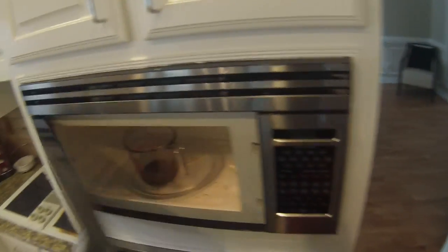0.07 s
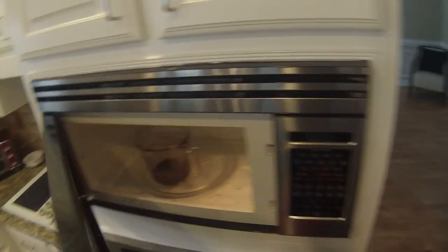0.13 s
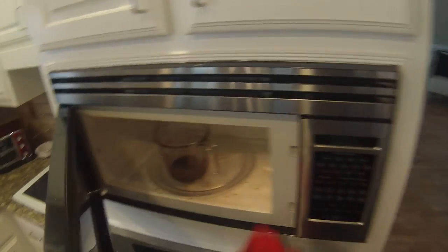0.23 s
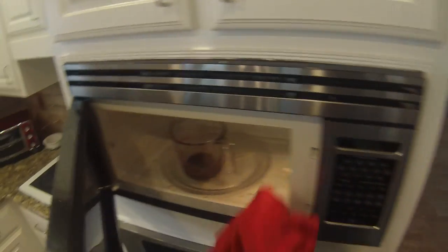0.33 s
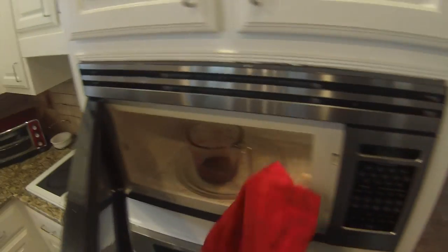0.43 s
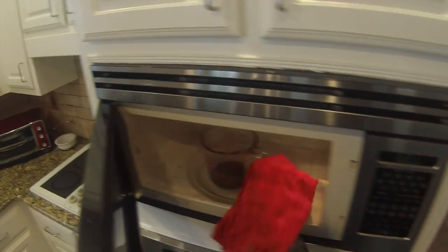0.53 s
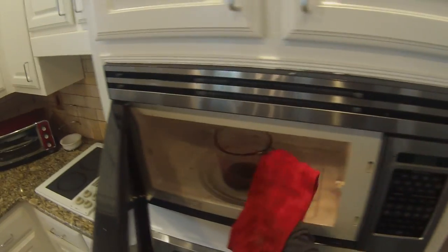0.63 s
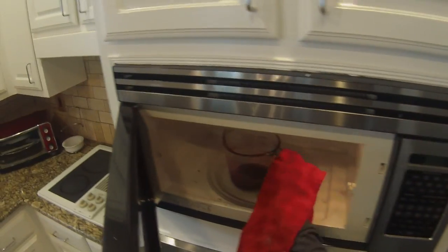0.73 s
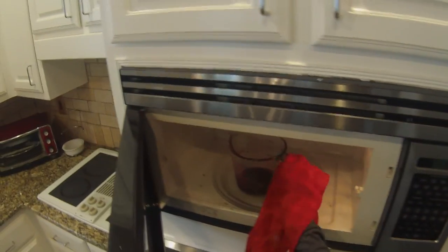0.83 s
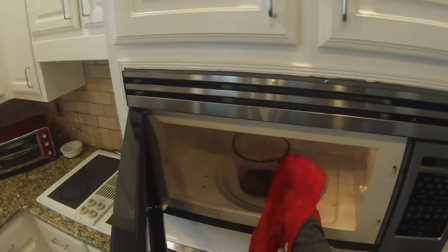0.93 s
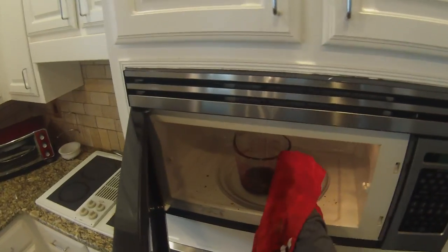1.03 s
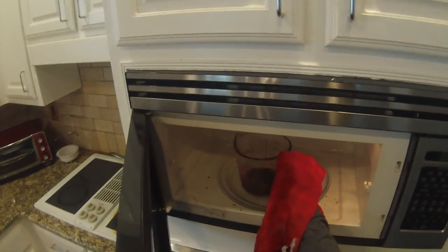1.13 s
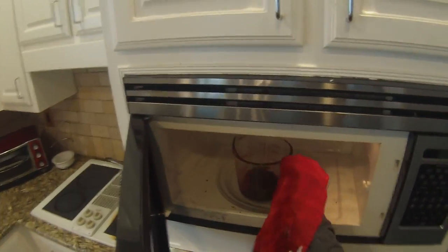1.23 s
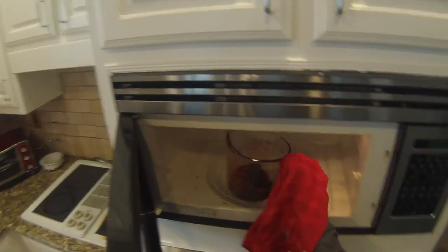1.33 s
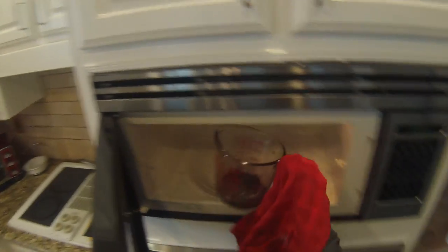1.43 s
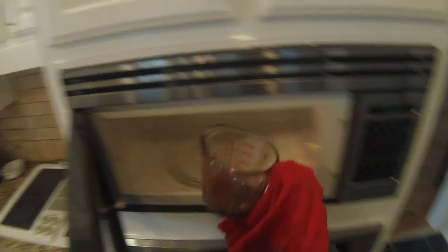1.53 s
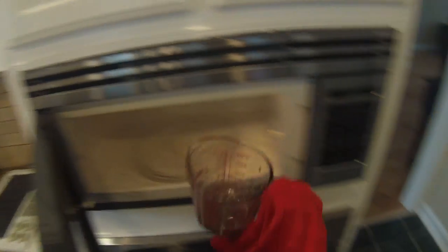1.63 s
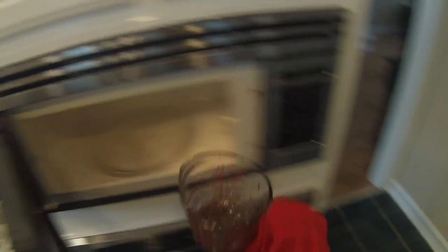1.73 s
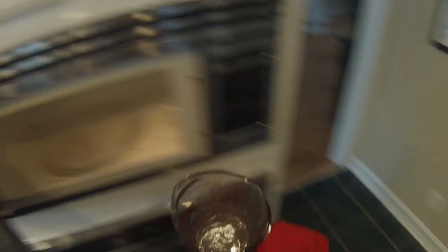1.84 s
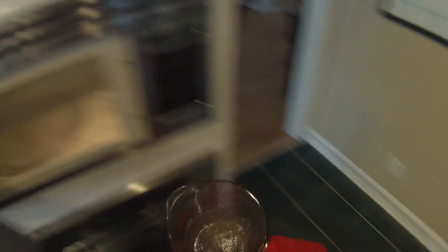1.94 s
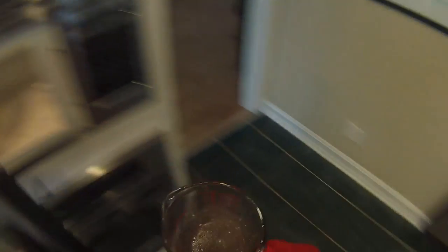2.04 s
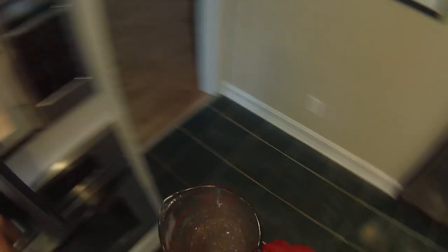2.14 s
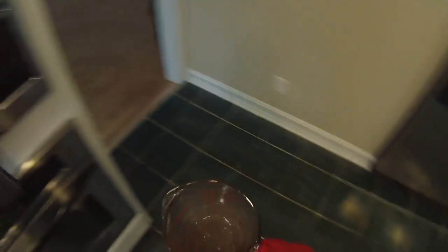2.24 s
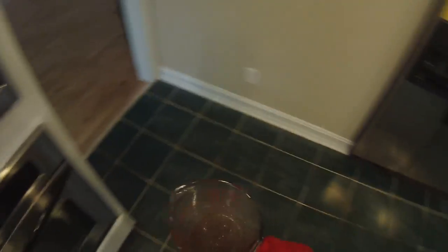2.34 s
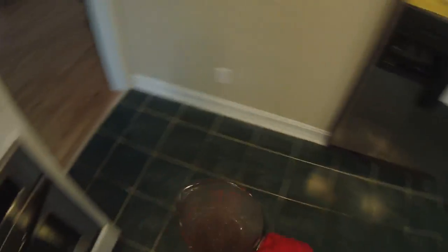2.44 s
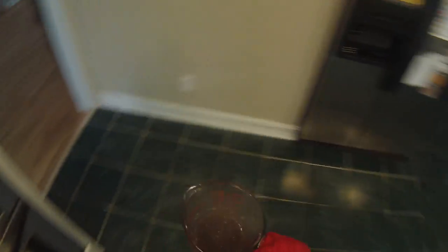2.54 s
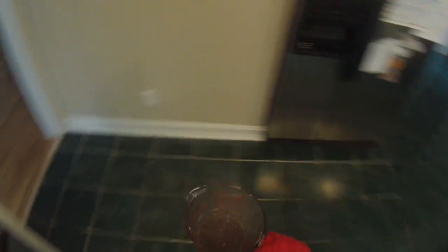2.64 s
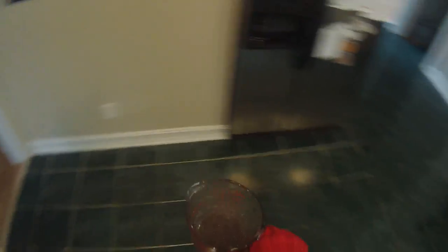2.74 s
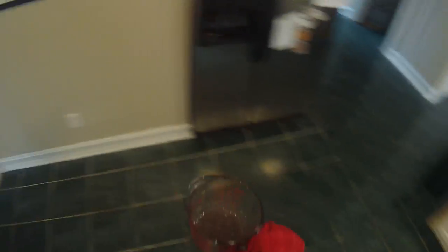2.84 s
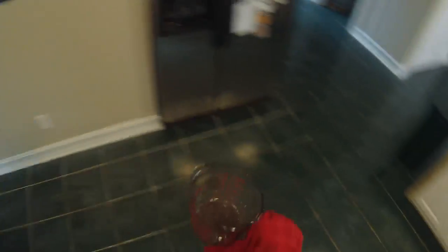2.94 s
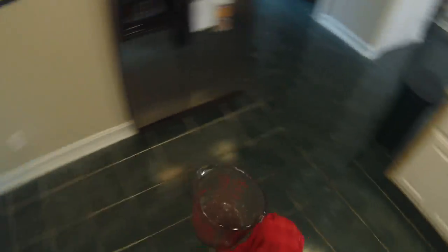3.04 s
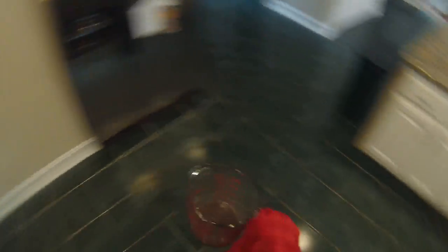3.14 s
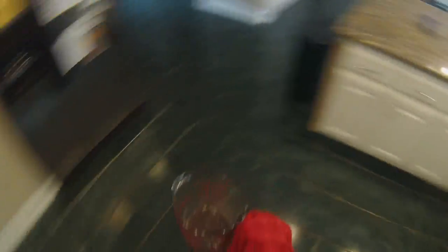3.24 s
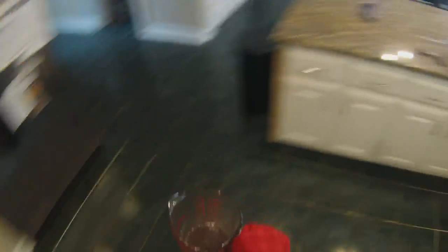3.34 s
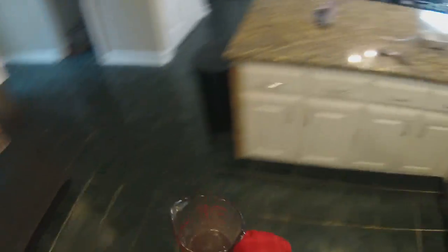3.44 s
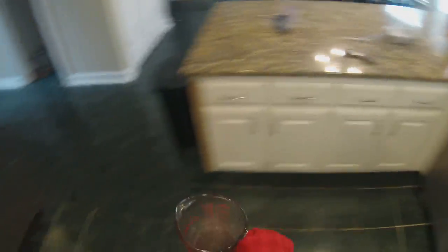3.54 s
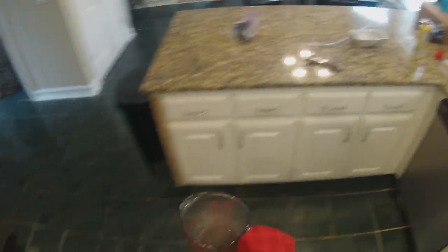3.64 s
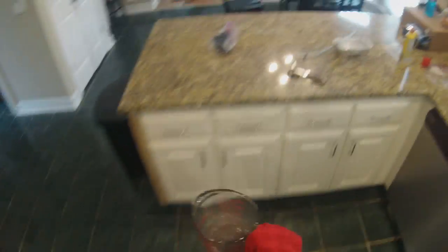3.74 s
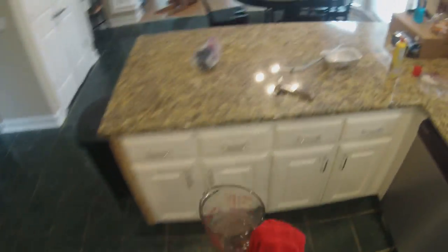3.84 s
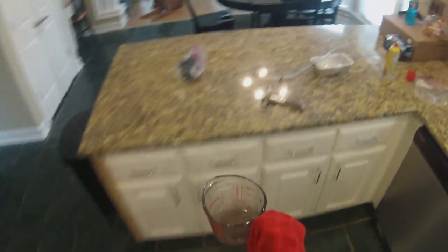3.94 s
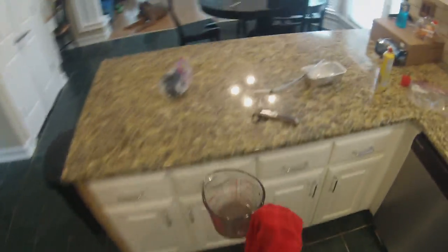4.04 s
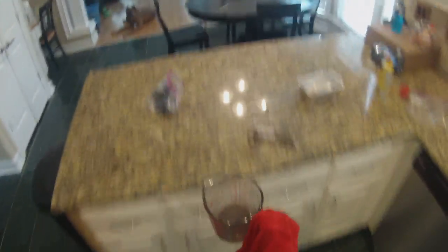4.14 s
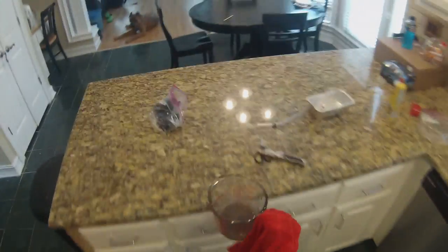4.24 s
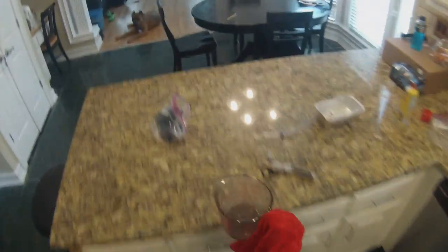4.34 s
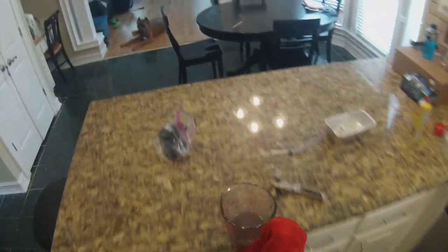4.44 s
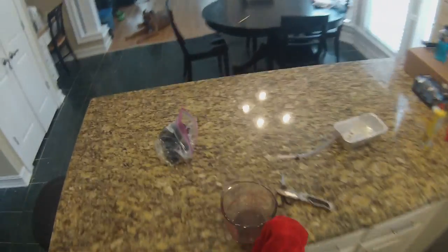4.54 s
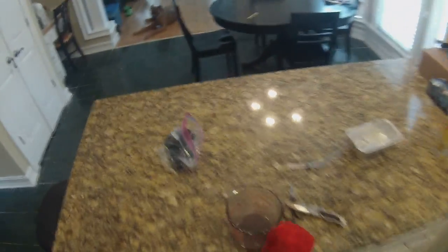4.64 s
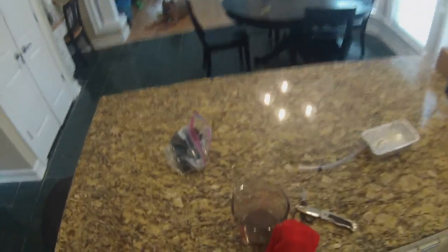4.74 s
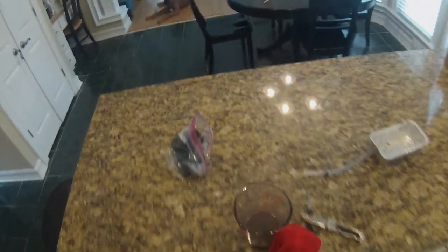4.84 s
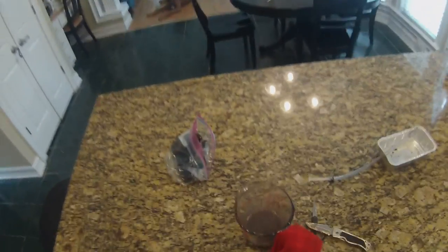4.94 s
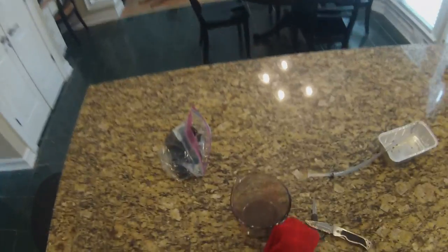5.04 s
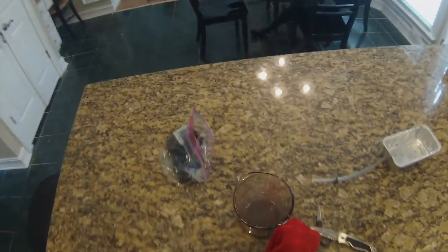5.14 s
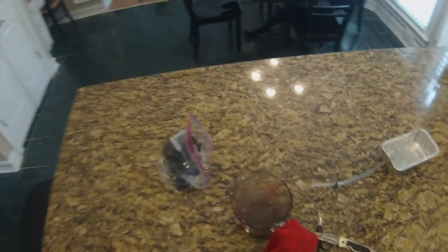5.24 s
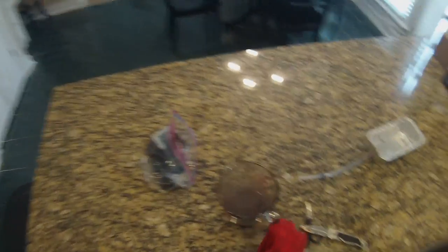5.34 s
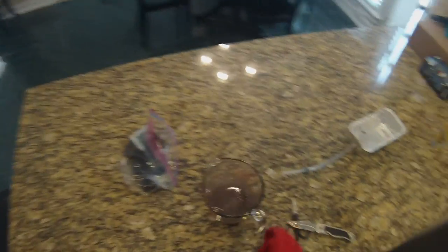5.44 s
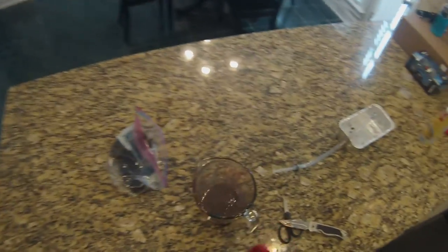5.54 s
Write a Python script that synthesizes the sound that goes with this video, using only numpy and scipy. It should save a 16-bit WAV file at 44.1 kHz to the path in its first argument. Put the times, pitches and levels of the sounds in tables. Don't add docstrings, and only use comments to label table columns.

```python
import sys
import numpy as np
from scipy import signal
from scipy.fft import rfft, irfft, next_fast_len
from scipy.io import wavfile
from scipy.ndimage import map_coordinates

SR = 44100
rng = np.random.default_rng(int(sys.argv[2]) if len(sys.argv) > 2 else 0)


def convert_level_to_amplitude(level_db):
    exponent = np.asarray(level_db, float) / 20
    return 10 ** exponent


def store_pcm(level_fs):
    pcm = np.round(np.clip(level_fs, -1, 1) * 32767).astype(np.int16)
    wavfile.write(sys.argv[1], SR, np.atleast_2d(pcm).T)


N = 246597

# t/s, peak level/dB
CUP_TOUCHES = [(4.898, 3.5), (4.942, -4.5), (4.959, -9.5), (4.995, -5), (5.017, -12.5), (5.027, -11),
               (5.108, -9), (5.12, -12.5), (5.131, -11.5), (5.147, -15.5), (5.234, -25), (5.288, -24),
               (5.352, -22)]
# f/Hz, level/dB
CUP_BODY = [(40, -67), (100, -17), (220, -19), (420, -11), (680, -1.5), (1000, -10), (1900, -14),
            (2700, -23), (3100, -30.5), (3900, -38.5), (4700, -47.5), (5500, -41.5), (9000, -49.5),
            (15000, -60.5)]
# f/Hz, width/Hz, level/dB
CUP_RESONANCES = [(215, 50, -2), (420, 60, 2), (575, 60, -6), (690, 80, 0)]
# t/s, level/dB
RIM_TOUCHES = [(0, -8), (.0016, -2), (.0030, -7), (.0052, -11), (.0078, -15)]
# f/Hz, width/Hz, level/dB
GLASS_EDGE = [(4300, 280, -6), (4850, 630, 6), (8500, 3000, -15), (12300, 1500, -10)]
# t/s, level/dB, rise/s, fade/s
DOOR_SHUDDER = [
    (2.755, -6, 0.041, 0.14),
    (2.786, -22.5, 0.0081, 0.26),
    (2.86, -28.5, 0.24, 0.59),
]
# t/s, peak level/dB
LATCH_BLOWS = [
    (2.754, -19),
    (2.756, 14),
]
# f/Hz, width/Hz, level/dB
OVEN_PANELS = [(105, 50, -10), (200, 80, -2), (290, 110, -3), (418, 90, -2), (500, 100, -2), (592, 90, 0),
               (720, 160, -6), (900, 200, -13)]
# f/Hz, level/dB, t60/s
DOOR_SKIN = [(188.3, 5.5, 0.25), (250, 10, 0.15), (298, 4, 0.15), (414, -40, 0.17)]
# f/Hz, level/dB
LATCH_RATTLE = [(530, -43), (900, 0), (1320, -10.5), (1670, -6), (2310, -7.5), (2390, -9), (3180, -9),
                (3800, -15), (4820, -9), (7230, -21.5), (10600, -29.5), (12800, -30), (15500, -40)]
# t/s, peak level/dB, tray ring level/dB
TRAY_BUMPS = [(0.734, -41.5, 2.5), (0.763, -28, -1), (0.777, -29, -17), (0.799, -35, 8), (0.829, -35, 3),
              (0.894, -38.5, -3), (0.911, -37.5, 7.5), (0.954, -35, -18), (0.984, -42.5, -32),
              (1.029, -41.5, -25)]
# f/Hz, level/dB, t60/s
TRAY_LOW = [(187, 9, 0.16), (322, 8, 0.1), (423, 2, 0.16), (503, -1, 0.22), (677, 10.5, 0.068),
            (1115, -9, 0.15), (1163, -9.5, 0.058)]
# f/Hz, level/dB, t60/s
TRAY_RING = [(769, -1.5, 0.09), (840.4, 4.5, 0.11), (870, -4, 0.088)]
# f/Hz, level/dB, t60/s
CLINK_MODES = [(1560, 0, 0.035), (1850, 2, 0.048), (1930, 6.5, 0.076), (1985, -2, 0.12), (2130, 0, 0.046),
               (2700, -2, 0.11), (2920, -2.5, 0.049), (3930, -6, 0.029), (4760, -10, 0.056),
               (5240, -14.5, 0.17)]
# t/s, peak level/dB, f/Hz, width/Hz
TICKS = [(.144, -51, 7500, 7000), (.179, -52, 6000, 7000), (0.212, -48, 3160, 900), (.238, -39, 3440, 9000),
         (1.295, -38.5, 2600, 12000), (2.546, -51.5, 4700, 1500), (2.611, -36, 1130, 900),
         (2.617, -53, 6000, 8940), (2.702, -49.5, 6500, 4000), (3.132, -53, 5400, 4060),
         (3.131, -51, 1240, 745), (3.524, -51, 5870, 3030), (3.587, -49.5, 3470, 3970)]
# t/s, peak level/dB, f/Hz, t60/s
THUDS = [(0.054, -41, 585, 0.049), (0.091, -45, 218, 0.069), (0.308, -36, 538, 0.11),
         (0.505, -47.5, 202, 0.03), (1.29, -44, 770, 0.14), (1.981, -55, 151, 0.074),
         (2.256, -48.5, 490, 0.35), (2.613, -62, 228, 0.1), (2.699, -41.5, 720, 0.08),
         (3.129, -34, 566, 0.12), (3.48, -49.5, 610, 0.39), (3.931, -43.5, 710, 0.078),
         (4.089, -43, 606, 0.085), (1.03, -42.5, 187, .1), (1.13, -50, 200, 0.34)]
# peak t/s, body level/dB, hiss re body level/dB, rise/s, fade/s
SLIDES = [(0, -45.5, -12.5, .05, 0.99), (.33, -62, -4.5, 0.27, 0.61), (1.15, -62, -25, 0.8, 0.65),
          (2.376, -61.5, -1.5, 0.53, 0.87), (2.617, -44, -10, 0.015, 0.25), (2.735, -43.5, -11, 0.22, .03),
          (3.134, -53.5, -6, 0.011, 0.85), (3.5, -61.5, -7.5, 0.45, 0.59), (3.68, -69.5, 0.5, .4, 0.41),
          (3.94, -53.5, -10.5, 0.017, 0.68), (3.987, -58, 3.5, 0.19, 0.72), (4.525, -52, -0.7, 0.3, .55)]
# f/Hz, level/dB
SLIDE_BODY = [(59, -37), (100, 1), (400, -8), (458, -7.5), (724, -4), (1460, -18.5), (2500, -19),
              (3250, -23.5), (5500, -120)]
# f/Hz, level/dB
SLIDE_HISS = [(710, -24), (1200, -55), (1760, -30), (2140, -12.5), (2980, -5.5), (3350, -4), (3850, -2),
              (6110, -3), (8700, -14.5), (13300, -18), (15500, -18)]
# t/s, level/dB
SQUEAKS = [
    (3.986, -48.5),
    (4.094, -62.5),
]
# f/Hz, width/Hz, level/dB
RUBBER = [(2100, 250, -4), (3380, 320, 0), (4750, 450, -7), (6050, 450, -9)]
# (f/Hz, level/dB, t60/s)
CHIRP = (4.245, -71, [(9280, 4.5, .12), (9420, 2, .12)])
# f/Hz, level/dB
ROOM_TONE = [(12, -7), (20, -3), (59, -5.5), (88, -10), (214, -13), (246, -15), (353, -15.5), (600, -18.5),
             (839, -20.5), (1140, -25.5), (1240, -26.5), (1680, -27), (3380, -30), (13300, -43.5),
             (15700, -49)]
# f/Hz, t60/s
KITCHEN_T60 = [(100, 0.72), (300, 0.75), (700, 0.98), (2000, 0.84), (5000, 0.82), (12000, 0.3)]


def cup():
    out, blow, landing = np.zeros(N), np.zeros(SR), np.zeros(SR // 50)
    add(blow, 0, pulse(CUP_BODY))
    blow += sum(filtered(blow, resonances([peak])) for peak in CUP_RESONANCES)
    edge = filtered(np.eye(1, SR)[0], resonances(GLASS_EDGE))
    for s, db in RIM_TOUCHES:
        add(landing, s, convert_level_to_amplitude(db - 14) * np.hanning(9))
    t = np.arange(SR // 50) / SR
    for k, (s, db) in enumerate(CUP_TOUCHES):
        lands = k == 0
        bright_db, wet_db = (-24.5, -4) if lands else (-27.5, -10 - 0.2 * db)
        roll = np.sin(np.pi * np.minimum(t / 0.009, 1)) ** 2
        rock = roll * np.sin(2 * np.pi * rng.normal(709, 59) * t) / roll.sum()
        scrape = rng.standard_normal(len(t)) * convert_level_to_amplitude(-60 * t / 0.053)
        scrape /= np.linalg.norm(scrape)
        body = convert_level_to_amplitude(db - 0.5) * blow
        shine = convert_level_to_amplitude(db + bright_db + 14) * edge
        if lands:
            direct = np.convolve(body, landing)[:SR] + np.convolve(shine, scrape)[:SR]
        else:
            hard_edge = np.eye(1, len(t), 90)[0]
            direct = np.convolve(body, convert_level_to_amplitude(9) * rock + convert_level_to_amplitude(-14.5) * hard_edge)[:SR]
        start = s + (0.0004 if lands else -0.0015)
        add(out, start, room(body + shine, wet_db, gap=0.005, direct=direct))
    return out


def door():
    envelope = sum(swell(*row) for row in DOOR_SHUDDER)
    panels = resonances(OVEN_PANELS)
    blows, pump = np.zeros(N), np.zeros(N)
    for s, db in LATCH_BLOWS:
        add(blows, s, convert_level_to_amplitude(db + 12) * np.hanning(24))
    shudder = envelope * convert_level_to_amplitude(-6.5) * unit(filtered(rng.standard_normal(N), panels))
    air_modes = [(25, -3.5, 1.0), (62.8, -6.5, 0.68)]  # f/Hz, level/dB, t60/s
    add(pump, 2.75, convert_level_to_amplitude(-24.5) * ring(air_modes, attack=0.011))
    add(shudder, 2.747, convert_level_to_amplitude(-20.5) * ring(DOOR_SKIN, attack=0.013))
    knock = convert_level_to_amplitude(-16.5) * filtered(blows, panels)
    rattle = convert_level_to_amplitude(-19) * envelope * noise(LATCH_RATTLE)
    return room(knock + shudder + rattle, wet_db=-11) + room(pump, wet_db=-12)


def tray():
    out = np.zeros(N)
    for s, db, ring_db in TRAY_BUMPS:
        clink_db = -55.5 + 1.9 * (db + 31)
        add(out, s, convert_level_to_amplitude(db - 13) * ring(TRAY_LOW, attack=0.0016, loose=0.028))
        add(out, s, convert_level_to_amplitude(db + ring_db - 0.5) * ring(TRAY_RING, attack=0.019, loose=0.011))
        add(out, s, convert_level_to_amplitude(clink_db) * ring(CLINK_MODES, attack=0.00029, loose=0.0112))
    return room(out, wet_db=-15)


def small_knocks():
    out = np.zeros(N)
    for s, db, hz, width_hz in TICKS:
        add(out, s, convert_level_to_amplitude(db) * burst(hz, width_hz, t60=0.013))
    for s, db, hz, t60 in THUDS:
        add(out, s, convert_level_to_amplitude(db) * burst(hz, 0.54 * hz, t60))
    return room(out, wet_db=-7)


def slides():
    body = sum(swell(s, db, rise, fade) for s, db, _, rise, fade in SLIDES)
    hiss = sum(swell(s, db + hiss_db, rise, fade) for s, db, hiss_db, rise, fade in SLIDES)
    grit = convert_level_to_amplitude(0.64 * wander(N // 200 + 4, np.arange(N) / 200))
    rubber = resonances(RUBBER)
    grip = sum(swell(s, db, rise=0.028, fade=0.25) for s, db in SQUEAKS)
    squeak = grip * unit(filtered(rng.standard_normal(N), lambda f: rubber(f) ** 2)) * grit ** 2.5
    chirp_s, chirp_db, chirp_modes = CHIRP
    add(squeak, chirp_s, convert_level_to_amplitude(chirp_db) * ring(chirp_modes, attack=0.0087))
    scuff = body * noise(SLIDE_BODY) + convert_level_to_amplitude(0.3) * hiss * grit * noise(SLIDE_HISS)
    return scuff + room(squeak, wet_db=-10)


def floor():
    t = np.arange(N) / SR
    sway = convert_level_to_amplitude(1.5 * wander(40, t * 5))
    hum = convert_level_to_amplitude(-67.5) * sway * np.sin(2 * np.pi * 59 * t)
    return convert_level_to_amplitude(-57) * noise(ROOM_TONE) + hum


def room(x, wet_db, gap=0.0068, direct=None):
    hz, t, z = signal.stft(rng.standard_normal(SR + SR // 2), SR, nperseg=256)
    decay = convert_level_to_amplitude(-60 * t / along(KITCHEN_T60, hz)[:, None])
    tail = signal.istft(z * decay, SR, nperseg=256)[1]
    tail = np.pad(tail / np.linalg.norm(tail), (round(gap * SR), 0))
    near = x if direct is None else direct
    return near + convert_level_to_amplitude(wet_db) * signal.fftconvolve(x, tail)[:len(x)]


def ring(modes, attack, loose=0):
    t = np.arange(SR // 2) / SR
    out = np.zeros(len(t))
    for hz, db, t60 in modes:
        decay = convert_level_to_amplitude(db + rng.normal(0, 2.5) - 60 * t / t60)
        out += decay * np.sin(2 * np.pi * hz * (1 + loose * rng.standard_normal()) * t)
    return out * (1 - np.exp(-t / attack))


def burst(hz, width_hz, t60):
    t = np.arange(SR // 5) / SR
    band = resonances([(hz, width_hz, 0)])
    x = filtered(rng.standard_normal(len(t)) * convert_level_to_amplitude(-60 * t / t60), lambda f: band(f) ** 2)
    return x / np.abs(x).max()


def swell(s, db, rise, fade):
    late = np.arange(N) / SR - s
    return convert_level_to_amplitude(db - 60 * np.maximum(-late / rise, late / fade))


def wander(count, places):
    return map_coordinates(rng.standard_normal(count), [places])


def resonances(peaks):
    def response(f):
        total = 0
        for k, (c, w, db) in enumerate(peaks):
            total = total + (-1) ** k * convert_level_to_amplitude(db) * 1j * f * w / (c * c - f * f + 1j * f * w)
        return total
    return response


def filtered(x, response):
    m = next_fast_len(len(x) + SR // 2)
    return irfft(rfft(x, m) * response(np.fft.rfftfreq(m, 1 / SR)), m)[:len(x)]


def noise(spectrum):
    return unit(filtered(rng.standard_normal(N), lambda hz: convert_level_to_amplitude(along(spectrum, hz))))


def pulse(spectrum, size=4096):
    cepstrum = irfft(np.log(convert_level_to_amplitude(along(spectrum, np.fft.rfftfreq(size, 1 / SR))) + 1e-6))
    cepstrum[1:size // 2] *= 2
    cepstrum[size // 2 + 1:] = 0
    p = irfft(np.exp(rfft(cepstrum)))
    return p / np.abs(p).max()


def along(points, hz):
    f, v = np.transpose(points)
    return np.interp(np.log(hz + 1), np.log(f + 1), v)


def unit(x):
    return x / np.sqrt(np.mean(x ** 2) + 1e-20)


def add(track, s, x):
    part = track[round(s * SR):][:len(x)]
    part += x[:len(part)]


def scene():
    return (cup() + door() + tray() + small_knocks() + slides() + floor())[None]


def top_cut(x):
    return signal.sosfilt(signal.butter(12, 15830, fs=SR, output="sos"), x)


def record(dry):
    limited = dry / (1 + np.abs(dry / 1.05) ** 8) ** (1 / 8)
    mix = np.array([filtered(channel, lambda hz: hz < 15450) for channel in limited])
    return top_cut(mix)


dry = scene()
out = record(dry)
store_pcm(out)
```